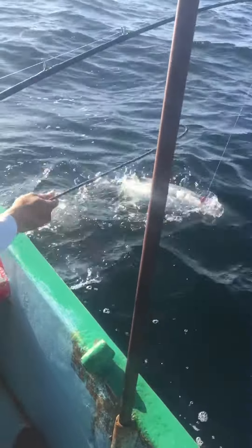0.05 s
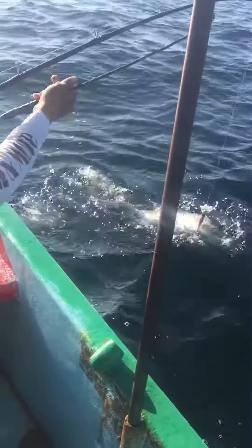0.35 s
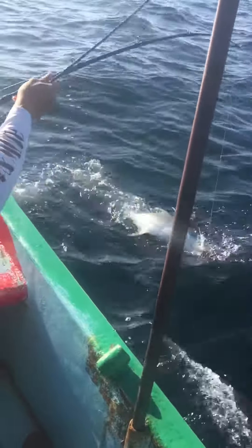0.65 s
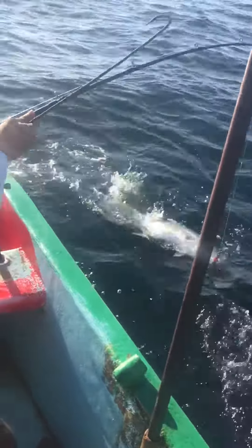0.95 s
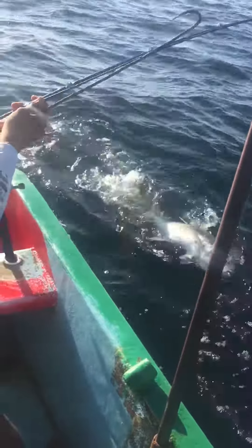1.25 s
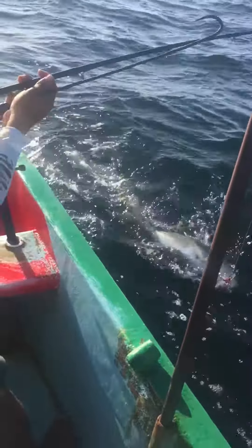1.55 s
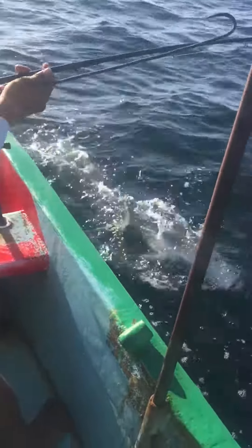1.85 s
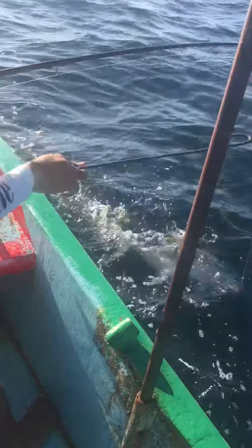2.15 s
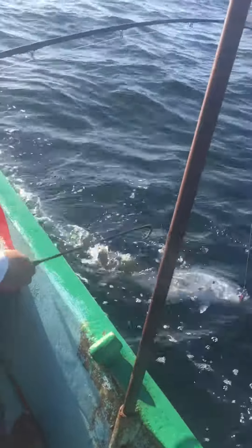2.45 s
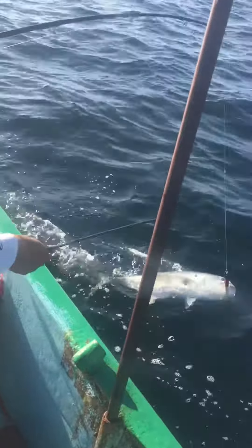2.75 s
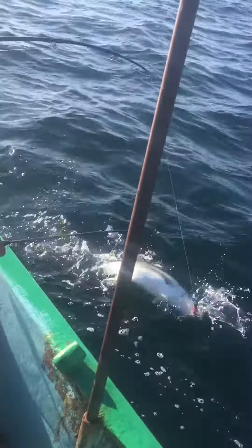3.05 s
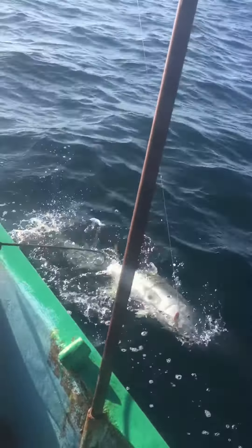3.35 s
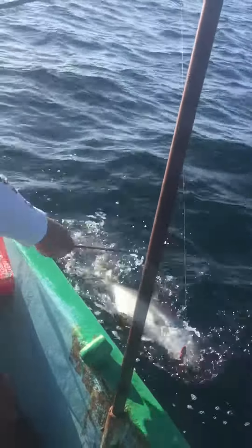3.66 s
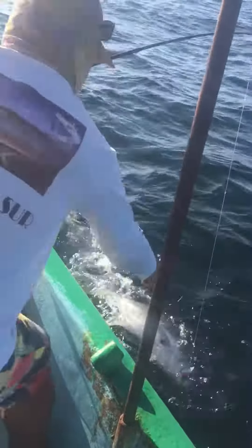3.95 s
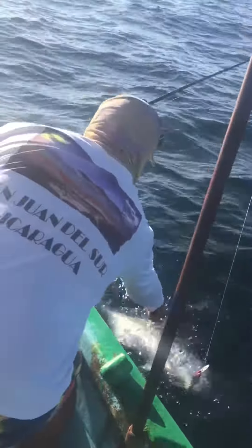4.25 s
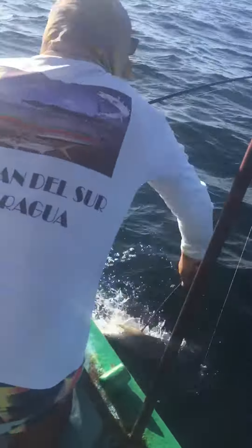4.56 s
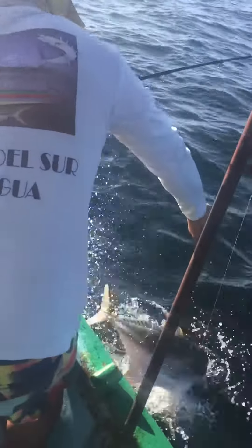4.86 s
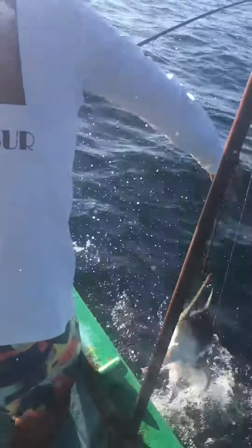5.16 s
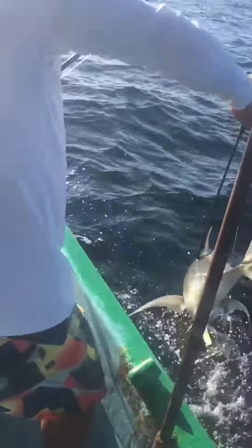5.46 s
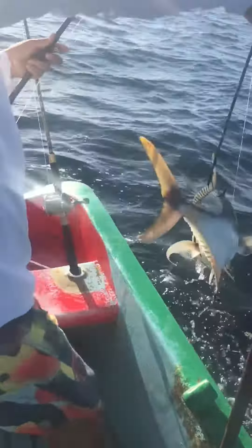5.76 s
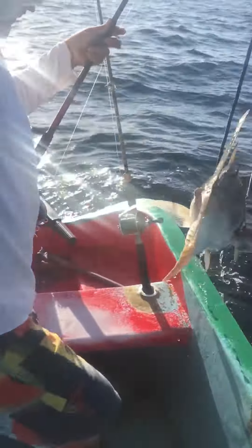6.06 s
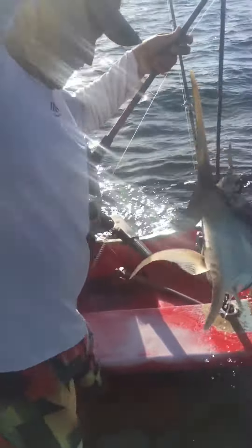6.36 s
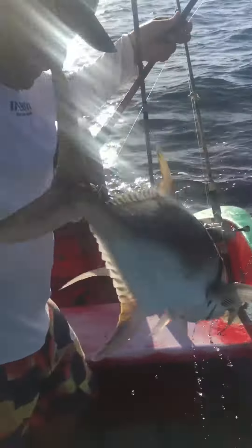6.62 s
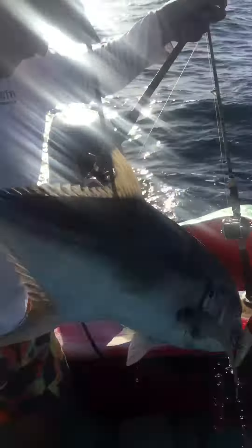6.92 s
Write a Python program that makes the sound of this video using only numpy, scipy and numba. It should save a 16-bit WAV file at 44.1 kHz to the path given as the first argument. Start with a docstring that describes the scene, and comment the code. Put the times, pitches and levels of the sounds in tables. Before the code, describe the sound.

From the start, a hooked fish thrashes at the surface close beside a small boat, in uneven bouts of bubbling, sharp tail slaps and pattering spray. Wind rumbles and buffets the microphone, gusting most from about 1 to 4 seconds, over a faint, steady wash of waves. Near 1 second a loud plop comes with a ringing knock on the hull. The splashing continues, with a burst of spray at about 3.3 seconds and a deep gulp at 3.6. A heavy hull knock lands around 4.3 seconds, followed by a lighter one. The biggest splashing runs from 4.5 to 5.2 seconds, ending with two softer knocks. The water then thins to drips and low gurgles. From about 6 seconds the fish bumps dully aboard several times while fishing tackle clicks and rattles, until the end near 7 seconds.

```python
"""A hooked fish thrashes at the surface beside a small open boat and is hauled aboard.
Its tail slaps up spray and traps air in the water. Each bubble rings like a tiny bell: big ones low,
small ones high. Heavy blows make the hull ring, and the fish bumps and the tackle clicks as it comes
over the side. Wind rumbles and buffets on the microphone, over a soft wash of waves."""
import sys
import numpy as np
from scipy import signal
from scipy.fft import rfft, irfft, next_fast_len
from scipy.io import wavfile
from scipy.ndimage import uniform_filter1d, map_coordinates
from numba import njit

SR = 44100
rng = np.random.default_rng(int(sys.argv[2]) if len(sys.argv) > 2 else 0)


def store_wav(level_fs):
    """Save 16-bit WAV to argv[1]."""
    pcm = np.round(np.clip(np.atleast_2d(level_fs), -1, 1) * 32767)
    wavfile.write(sys.argv[1], SR, pcm.T.astype(np.int16))


N = 308259
TIME = np.arange(N) / SR

# bouts of thrashing: (time [s], hold [s], bubbling [dB], spray [dB])
BOUTS = [(0, 0.011, -43.5, -51), (0.116, 0.1, -50.5, -61.5), (0.233, 0.42, -45.5, -55.5),
         (0.67, 0.46, -43, -52.5), (1.271, 0.2, -46, -51.5), (1.542, 0.24, -46.5, -58.5),
         (1.967, 0.11, -46.5, -59.5), (2.473, 0.12, -51, -52.5), (2.695, 0.4, -50, -63.5),
         (2.901, 0.13, -46.5, -48), (3.159, 0.099, -51, -48), (3.27, 0.11, -40, -48.5),
         (3.347, 0.02, -40, -35.5), (3.529, 0.33, -46, -51), (4.012, 0.029, -47.5, -64),
         (4.516, 0.088, -43, -47.5), (4.613, 0.56, -38, -41.5), (4.64, 0.024, -40.5, -42),
         (5.247, 0.38, -51.5, -53), (5.575, 0.06, -53.5, -50), (5.736, 0.16, -69, -53),
         (6.114, 0.066, -72, -64), (6.494, 0.34, -72, -62)]
# tail slaps and falling sheets of water: (time [s], body [dB], pitch [Hz], fizz [dB])
TAIL_SLAPS = [(0.432, -29.5, 1500, -63), (0.481, -33, 2190, -32), (0.692, -25.5, 2000, -39),
              (1.011, -27.5, 2580, -41), (1.263, -32.5, 1778, -46), (1.317, -29.5, 1870, -34.5),
              (1.657, -36, 2940, -61), (1.851, -37, 2860, -44), (2.146, -33, 2200, -41),
              (2.165, -24, 3130, -26.5), (2.492, -30.5, 2950, -72), (2.525, -30.5, 1970, -31.5),
              (2.589, -28, 1530, -48), (2.615, -29.5, 1430, -32), (2.936, -29.5, 1160, -70),
              (3.04, -36, 2020, -50), (3.115, -27.5, 2690, -40), (3.305, -22.5, 2680, -36),
              (3.664, -31, 1880, -59), (3.702, -31.5, 1240, -44), (3.82, -29, 1700, -28),
              (3.873, -35, 1700, -42), (4.11, -50, 1500, -38.5), (4.426, -30, 1430, -40),
              (4.53, -17.5, 2280, -40), (4.781, -26, 1510, -38), (4.866, -17.5, 1920, -38),
              (4.886, -22, 1710, -45), (5.057, -26, 2600, -35.5), (5.733, -38, 4200, -59),
              (5.785, -30.5, 3130, -55), (5.823, -25.5, 3600, -59)]
# air pockets and drips that ring: (time [s], level [dB], pitch [Hz])
AIR_POCKETS = [(0.01, -29, 1025), (.246, -27.5, 994), (0.941, -8.5, 775), (1.484, -32.5, 696),
               (1.828, -29, 2020), (1.931, -34, 2020), (2.163, -25, 710), (2.526, -31, 1930),
               (2.937, -22, 882), (3.043, -31.5, 840), (3.28, -29, 994), (3.808, -27, 1430),
               (3.872, -32.5, 866), (4.187, -39, 1880), (4.538, -31, 815), (4.788, -21, 1114),
               (4.866, -15.5, 1095), (5.08, -27.5, 726), (5.952, -45.5, 2020), (6.154, -38.5, 2110),
               (6.295, -41, 1120)]
# air holes closing or opening: (time [s], level [dB], first pitch [Hz], last pitch [Hz], length [s])
CAVITIES = [(0.445, -31, 585, 1240, 0.023), (0.552, -37, 1930, 2640, 0.022),
            (0.561, -34.5, 1234, 630, 0.025), (1.132, -37, 892, 1330, 0.036),
            (1.803, -43, 1000, 1460, .025), (1.938, -43.5, 1560, 1100, 0.039),
            (6.155, -42.5, 736, 1010, 0.019)]
# water gulping under the fish and against the boat, and at the end the fish sliding across the deck: (time [s],
# level [dB], pitch [Hz], fade time [s])
HOLLOWS = [(.268, -33.5, 417, 0.2), (.742, -23.5, 282, 0.15), (1.0, -13, 500, 0.055),
           (3.108, -34.5, 446, 0.12), (3.576, -6.5, 485, 0.02), (3.598, -27.5, 430, 0.1),
           (3.706, -30.5, 483, 0.32), (4.075, -33, 497, 0.12), (5.46, -40, 550, 0.31),
           (5.61, -49.5, 730, 0.77), (5.822, -35.5, 330, 0.3), (5.9, -47.5, 617, 0.21),
           (6.2, -52.5, 940, 0.53), (6.93, -43, 503, 0.49)]
# single drops landing close by: (time [s], tick [dB], bubble [dB], bubble pitch [Hz])
NEAR_DROPS = [(.013, -39, -44, 8300), (.281, -40, -36, 5640), (0.853, -42, -41, 3600),
              (.902, -26, -41, 6920), (1.442, -48, -34, 8550), (1.676, -30, -32.5, 3040),
              (1.829, -39, -36, 2940), (2.037, -36, -40, 6350), (2.585, -31.5, -29, 8250),
              (2.83, -38, -56, 7060), (3.228, -50, -33.5, 5400), (3.608, -31, -39, 4500),
              (3.636, -33, -30.5, 8200), (4.07, -49, -41, 4100), (4.108, -36, -40.5, 3240),
              (4.204, -42, -42, 6300), (5.485, -51, -36, 3780), (5.856, -42, -39, 11800),
              (5.946, -38.5, -41.5, 3620)]
# blows on the hull: (time [s], thud [dB], push time [s], ring [dB], crack [dB], top of the crack [Hz],
# centre of the ring [Hz], place along the hull [m])
HULL_BLOWS = [(.968, -20.5, 0.015, -17, -23.5, 3970, 540, .784),
              (4.274, -12, 0.009, -12.5, -19, 12100, 530, 2.678),
              (4.403, -23.5, 0.01, -21, -30.5, 7100, 403, 0.29),
              (5.203, -25, 0.011, -24, -28, 3000, 438, 0.333),
              (5.36, -30, 0.0083, -21, -32.5, 1790, 480, 2.9)]
# the tones of the hull's panels: (pitch [Hz], level [dB], fade time [s])
HULL_TONES = [(257, 3.5, 0.21), (312.8, 9, 0.19), (363, -8, 0.32), (467.2, 0, 0.28), (528, -6.5, 0.33),
              (590, -26, 0.099), (668.4, 1.5, 0.15), (790, -7, 0.072), (853, -6, 0.25), (916, 1, 0.12),
              (1031, 2.5, 0.13), (1130, 4, 0.18), (1230, -4, 0.11), (1480, -21, 0.23), (1754, -4, 0.15)]
# dull bumps as the fish is swung in: (time [s], level [dB], first pitch [Hz], fade time [s])
FISH_BUMPS = [(5.901, -31, 200, .09), (6.096, -25, 153, 0.14), (6.519, -16, 199, 0.093),
              (6.557, -25.5, 180, 0.061), (6.671, -27, 398, 0.085), (6.678, -20.5, 168, 0.07),
              (6.685, -38, 640, .025), (6.784, -25.5, 227, 0.033), (6.883, -20.5, 190, .07)]
# rod, hook and tackle clicking: (time [s], tick [dB], ring [dB], ring pitch [Hz])
TACKLE_CLICKS = [(6.393, -41, -37.5, 4700), (6.45, -42, -53, 6650), (6.495, -44, -49, 8500),
                 (6.513, -42, -52, 9500), (6.53, -40, -45, 8500), (6.543, -31, -43, 7450),
                 (6.561, -33, -40, 8300), (6.596, -44, -39.5, 3670), (6.653, -21, -37, 6800),
                 (6.721, -28.5, -30, 3080), (6.733, -50, -32.5, 1240), (6.741, -55, -38, 1070),
                 (6.786, -34, -38, 7100), (6.879, -31, -39.5, 7250), (6.98, -29, -48, 5730)]
# the wind's slow rise and fall: (time [s], level [dB])
WIND_LEVELS = [(0, -34), (.4, -36.5), (.77, -34.5), (.92, -41), (1.17, -31.5), (1.62, -35), (1.85, -31),
               (2.3, -31), (2.62, -34), (2.93, -28.5), (3.07, -41), (3.28, -32.5), (3.68, -36),
               (3.85, -31.5), (4.03, -38.5), (4.25, -39), (4.52, -34.5), (4.95, -36.5), (5.12, -36),
               (5.26, -39.5), (5.45, -32), (5.74, -41.5), (6.1, -49), (6.22, -46.5), (6.7, -39),
               (6.99, -37.5)]
# sheltered by the angler, the wind turns deeper: (time [s], bass gain [dB], deep rumble gain [dB])
WIND_SHELTER = [(0, 1, -17), (4, -4, -46), (5.2, 3.5, -28), (6.2, 6, 4), (6.6, -12, -1.5), (7, -9, -5.5)]
# strong swirls of air hitting the microphone: (time [s], level [dB], pitch [Hz])
STRONG_EDDIES = [(0.236, -20, 168), (1.25, -14.5, 192), (1.444, -12, 187), (1.804, -16.5, 161),
                 (1.846, -17, 161), (2.019, -14.5, 200), (2.061, -12.5, 266), (2.121, -13.5, 212),
                 (2.755, -15, 176), (2.958, -16.5, 194), (3.193, -15, 179), (3.419, -11, 234),
                 (3.584, -8.5, 328), (3.591, -9.5, 96), (3.824, -11.5, 197)]
# tone colours, or how strong each sound is from low to high: (frequency [Hz], level [dB])
WATER_SPECTRUM = [(250, 19), (500, -1), (700, 3.5), (1120, 0.5), (1320, -1.5), (1650, -2), (2300, -7),
                  (3200, -7), (5000, -15.5), (8500, -18.5), (10300, -23), (12000, -22), (16000, -27.5)]
DROP_SPECTRUM = [(1000, -23), (3000, 4), (6000, 11), (9000, 7.5), (10300, -1), (12000, 8), (15000, 5)]
THUD_SPECTRUM = [(30, -47), (60, -11), (170, 1.5), (320, -22), (480, 0.5), (680, -2), (950, -21.5),
                 (1200, -1.5), (1550, -32), (2500, -18), (5000, -32), (16000, -45)]
CRACK_SPECTRUM = [(300, 3.5), (1100, 13), (3500, -4), (4600, -9.5), (6500, -7), (10000, -13), (16000, -9)]
WIND_SPECTRUM = [(20, -19), (32, -36), (48, -4), (70, 2), (130, 2.5), (190, -2), (290, -7.5), (370, -14.5),
                 (470, -29), (700, -70), (2000, -90)]
SEA_SPECTRUM = [(60, -38), (300, 8.5), (900, -1), (2000, -10.5), (4000, -11.5), (5500, -18), (9000, -16.5),
                (10300, -26), (12000, -18.5), (16000, -25)]

TOP_HZ = 15700  # the treble ends here


def thrashing(column, fall_db_per_s, idle_db):
    """Level of the churned water in dB: each bout rises, holds while the fish beats, then settles."""
    t, rise_s = TIME[::40], 0.022
    power = undb(2 * idle_db)  # water running off between bouts
    for bout in BOUTS:
        age, hold_s = t - bout[0], bout[1]
        rise = np.clip(age / rise_s, 0, 1)
        db = bout[column] - fall_db_per_s * np.maximum(age - hold_s, 0)
        power = power + (rise * undb(db)) ** 2
    return np.interp(TIME, t, 10 * np.log10(power))


def churn(bubbling_db, spray_db):
    """The fish stirs up bubbles, crackling drops and froth: big ones burble, small ones hiss as spray."""
    bubbles = cloud(count=2200, size=3, low_hz=400, high_hz=14000, cycles=64, scatter_db=4.6, glide=.06)
    drops = cloud(count=3600, size=5, low_hz=400, high_hz=17000, cycles=14, scatter_db=4.2, glide=0.)
    froth = cloud(count=12000, size=6, low_hz=400, high_hz=17000, cycles=45, scatter_db=1, glide=.05)
    rush = unit(band(rng.standard_normal(N), 400, "high"))
    # harder thrashing merges the drops into froth, then into a smooth rush
    drops_db = -2.5
    froth_db = np.clip((bubbling_db + 47.5) * 1.3, -3, 6)
    rush_db = np.minimum(2 * (bubbling_db + 43), 4)
    water = bubbles + undb(drops_db) * drops + undb(froth_db) * froth + undb(rush_db) * rush
    water /= np.sqrt(1 + undb(2 * drops_db) + undb(2 * froth_db) + undb(2 * rush_db))
    water = colour(water, WATER_SPECTRUM) * undb(1.4 * wander(35))  # it lands in clumps
    bubbling = unit(band(water, 2320, "low", order=3)) * undb(bubbling_db)
    spray = unit(band(water, 2720, "high", order=3)) * undb(spray_db)
    return bubbling + spray


def slaps():
    """Each slap is a sudden burst of bubbles around one size, with a fizz of fine drops on top."""
    out = np.zeros(N)
    spatter = cloud(count=14000, size=4, low_hz=400, high_hz=17000, cycles=40, scatter_db=2, glide=.1)
    for start, db, hz, fizz_db in TAIL_SLAPS:
        drops = spatter[int(start * SR):][:SR // 5]
        t60 = 0.049 * (1500 / hz) ** 0.5  # bigger bubbles last longer
        spectrum = [(hz / 5, -16), (hz / 2, -5), (hz, 0), (hz * 1.6, -6), (hz * 3, -23), (hz * 9, -44)]
        body = colour(drops, spectrum)
        fizz = colour(drops, [(2500, -22), (5200, 0), (9000, -1), (11000, -7), (15000, -13)])
        add(out, start, undb(db) * burst(body, t60, rise_s=0.003))
        add(out, start, undb(fizz_db) * burst(fizz, t60=0.02, rise_s=0.0011))
    return out


def plops():
    """Big air pockets dragged under by the tail break up fast; small drips ring longer. Both chirp up."""
    start, db, hz = (np.array(column, float) for column in zip(*AIR_POCKETS))
    cycles = np.clip(-1.8 * db, 20, 70)
    return ring_bubbles(start, hz, cycles, undb(db), glide=.45)


def gurgles():
    """The air in a hole sings a short note that rises as the hole closes or falls as it opens."""
    out = np.zeros(N)
    for start, db, from_hz, to_hz, length_s in CAVITIES:
        progress = np.linspace(0, 1, int(length_s * SR))
        hz = from_hz * (to_hz / from_hz) ** progress
        add(out, start, undb(db) * np.sin(np.pi * progress) * np.sin(2 * np.pi * np.cumsum(hz) / SR))
    return out


def stray_bubbles(bubbling_db, count=190, size=3):
    """Air pockets split into a few unlike bubbles, louder in busy water until the froth swallows them."""
    spread_s, spread_octaves = 0.035, 0.62
    when, radius, force = rng.random((3, count, 1))
    lag, detune, share = rng.random((3, count, size))
    start = when * N / SR + spread_s * lag
    hz = (560 * 5 ** radius * 2 ** (spread_octaves * (detune - .5))).ravel()
    water_db = np.minimum(bubbling_db[(when * N).astype(int)], -43.5)
    peak = undb(water_db + 9 + 7.5 * (2 * force - 1) - 5 * radius) * share
    cycles = 49 * np.sqrt(hz / 1500)
    return ring_bubbles(start.ravel(), hz, cycles, peak.ravel(), glide=0.23)


def gulps():
    """A hollow in the water caves in and makes a dull cluster of very big bubbles; the same dull burst also
    gives the fish scraping across the deck."""
    out = np.zeros(N)
    pockets = cloud(count=4000, size=3, low_hz=200, high_hz=2000, cycles=12, scatter_db=1, glide=.15)
    for k, (start, db, hz, t60) in enumerate(HOLLOWS):
        bubbles = pockets[k * SR // 3:][:SR // 3]
        hollow = colour(bubbles, [(hz / 2.5, -12), (hz, 0), (hz * 1.7, -14), (hz * 4, -40)])
        add(out, start, undb(db) * burst(hollow, t60, rise_s=0.0023))
    return out


def droplets(spray_db, count=130):
    """Each drop ticks as it lands and traps a tiny ringing bubble."""
    ticks, t = np.zeros(N), TIME[:SR // 20]
    when, force, pitch = rng.random((count, 3)).T
    # flung drops stand out of the spray until it becomes a sheet
    db = np.minimum(spray_db[(when * N).astype(int)], -54) + 15 - 2 * force ** 2
    flung = np.column_stack([when * N / SR, db, db - 11, 2300 * 4 ** pitch])  # laid out like NEAR_DROPS
    starts, tick_db, ring_db, hz = np.vstack([flung, NEAR_DROPS]).T.copy()
    for start, level_db in zip(starts, tick_db):
        add(ticks, start, undb(level_db) * fade(t, t60=0.0088) * (1 - np.exp(-t / 0.0003)))
    cycles = 77 * np.sqrt(hz / 5000)
    rings = ring_bubbles(starts + .001, hz, cycles, undb(ring_db), glide=0.12)
    return ticks * noise(N, DROP_SPECTRUM) + rings


def cloud(count, size, low_hz, high_hz, cycles, scatter_db, glide):
    """Each of `count` falling blobs of water makes `size` similar bubbles, some far louder than others."""
    when, pitch, force = rng.random((3, count, 1))
    lag, detune, life, share = rng.random((4, count, size))
    blob_hz = (np.sqrt(low_hz) + pitch * (np.sqrt(high_hz) - np.sqrt(low_hz))) ** 2
    hz = blob_hz * 2 ** ((detune - .5) / 2)
    strength = -np.log(force + np.exp(-4)) * (hz / 4000) ** .25  # fine drops vary most in force
    peak = undb(scatter_db * strength) * hz ** (3 / 5) * share ** 2
    start = when * N / SR + .012 * lag ** 2
    ring_cycles = cycles * (.5 + life) * (hz / 3000) ** .4  # big bubbles break up after fewer cycles
    return unit(ring_bubbles(start.ravel(), hz.ravel(), ring_cycles.ravel(), peak.ravel(), glide))


@njit
def ring_bubbles(start, hz, cycles, peak, glide):
    """Each bubble is a pure tone that fades by 60 dB and glides up in pitch as it nears the surface."""
    out = np.zeros(N)
    for k in range(len(start)):
        first, length = int(start[k] * SR), int(cycles[k] * SR / hz[k]) + 2
        step, loss = 2 * np.pi * hz[k] / SR, np.exp(-6.9 / length)
        phase, size = 0., peak[k]
        for i in range(min(length, N - first)):
            phase += step * (1 + glide * i / length)
            size *= loss
            out[first + i] += size * np.sin(phase) * min(phase / 11, 1.)
    return out


def water_echoes(x, bounce_gain=.4, scatter_db=-9):
    """The side of the boat throws back one close echo, and the facing waves a short scatter of them."""
    t = TIME[:SR // 10]
    echoes = rng.standard_normal(len(t)) * fade(t, t60=0.11) * (t > .002)
    scatter = signal.fftconvolve(x, echoes / np.sqrt(np.sum(echoes ** 2)))[:N]
    delay_s = .0011 * np.exp(.25 * wander(2))  # sways as fish and boat move
    bounce = map_coordinates(x, [(TIME - delay_s) * SR])
    return (x + bounce_gain * bounce) / np.hypot(1, bounce_gain) + undb(scatter_db) * scatter


def hull_blows():
    """A blow cracks on contact, swells to a thud as the weight follows, and leaves the panels ringing."""
    out, t = np.zeros(N), TIME[:SR // 2]
    hz, db, t60 = np.transpose(HULL_TONES)[:, :, None]
    wavelength_m = .3 / np.sqrt(hz / 1000)  # of the waves that bend the hull
    for start, thud_db, push_s, ring_db, crack_db, top_hz, centre_hz, place_m in HULL_BLOWS:
        # a tone stays weak when the blow lands where that tone hardly moves the hull
        reach = .2 + np.abs(np.sin(2 * np.pi * place_m / wavelength_m))
        weight = reach * undb(db - 4 * np.log2(hz / centre_hz) ** 2)
        weight /= np.sqrt(np.sum(weight ** 2) / 2)
        detune, phase = rng.uniform(-1.05, 1, (2, len(HULL_TONES), 1))
        tones = weight * np.sin(2 * np.pi * (hz * (1 + 0.0045 * detune) * t + phase))
        shudder = noise(len(t), THUD_SPECTRUM)  # the rest of the boat
        swell = (t / push_s * np.exp(1 - t / push_s)) ** 3
        thud = unit((tones.sum(axis=0) + shudder / 2) * swell) * np.sqrt(np.mean(swell ** 2))
        boom = undb(-1.5) * band(shudder, 940, "low") * fade(t, 0.26)
        ring = ((tones * fade(t, t60)).sum(axis=0) + boom) * (1 - np.exp(-t / push_s))
        crack = band(noise(len(t), CRACK_SPECTRUM) * fade(t, 0.13), top_hz, "low", order=4)
        add(out, start, undb(thud_db) * thud + undb(ring_db) * ring + undb(crack_db) * crack)
    return out


def fish_bumps(rise_s=0.0024, sag_s=0.012, end_share=0.366):
    """The soft, heavy fish bumps aboard: a short low tone that sinks in pitch as it dies."""
    out, t = np.zeros(N), TIME[:SR // 5]
    sag = end_share + (1 - end_share) * np.exp(-t / sag_s)
    for start, db, hz, t60 in FISH_BUMPS:
        shape = (1 - np.exp(-t / rise_s)) ** 2 * fade(t, t60)
        add(out, start, undb(db) * shape / shape.max() * np.sin(2 * np.pi * np.cumsum(hz * sag) / SR))
    return out


def tackle():
    """Hard fishing gear strikes with a bright tick, then a short rattling ring."""
    out, t = np.zeros(N), TIME[:SR // 5]
    snap = fade(t, t60=.006)
    rattle = undb(-14) * snap + fade(t, 0.057) + undb(-13) * fade(t, 0.23)  # hit, ring, echo in the boat
    for start, tick_db, ring_db, hz in TACKLE_CLICKS:
        tick = noise(len(t), [(1200, -32), (3500, -10), (7000, -1), (11000, 11.5), (15000, 9.5)])
        ring = noise(len(t), [(hz / 3, -36), (hz / 1.4, -5), (hz, 0), (hz * 1.8, -11), (hz * 3.5, -23)])
        add(out, start, undb(tick_db) * tick * snap + undb(ring_db) * ring * rattle)
    return out


def wind(gust_db=2.14, buffet_at_s=3.61, buffet_half_s=0.016):
    """Air tumbles over the microphone; stronger wind makes smaller, faster swirls that sound higher."""
    db = curve(WIND_LEVELS, column=1) + gust_db * wander(14)
    rumble = noise(N, WIND_SPECTRUM)
    rumble /= np.sqrt(uniform_filter1d(rumble ** 2, size=3000))  # even it out before the gusts shape it
    bass = band(band(rumble, 124, "low")[::-1], 150, "low")[::-1]
    flutter = rumble - bass
    bass_gain = undb(curve(WIND_SHELTER, column=1))
    flutter_gain = undb(1.37 * np.minimum(db + 33, 3))
    deep = undb(curve(WIND_SHELTER, column=2)) * noise(N, [(20, -33), (45, 1), (70, 2), (300, -88)])
    buffet = undb(-10) * np.exp(-((TIME - buffet_at_s) / buffet_half_s) ** 4) * flutter  # one heavy gust
    return undb(db) * (deep + bass_gain * bass + flutter_gain * flutter) + buffet


def eddies(count=45):
    """Each swirl of air pushes and pulls once; small ones come at random and grow with the wind."""
    out, t = np.zeros(N), TIME[:SR // 10] - 1 / 20
    when, weakness, pitch = rng.random((count, 3)).T
    wind_db = curve(WIND_LEVELS, column=1)[(when * N).astype(int)]
    lull_db = np.minimum(wind_db + 35, 0)  # weaker still in a lull
    small_db = wind_db + lull_db + 14.5 - 3 * weakness
    small_eddies = zip(when * N / SR, small_db, 174 * 2 ** (pitch - .5))
    for start, db, hz in [*small_eddies, *STRONG_EDDIES]:
        shape = np.exp(-(t * hz / 0.47) ** 2)
        add(out, start + t[0], undb(db) * shape * np.cos(2 * np.pi * (hz * t + rng.random())))
    return out


def sea():
    """Waves all around make a soft wash that slowly swells and sinks."""
    return noise(N, SEA_SPECTRUM) * undb(-59 + 1.5 * wander(3))


def undb(db):
    """Turn decibels into a gain to multiply by."""
    return 10 ** (np.asarray(db) / 20)


def unit(x):
    """Scale a sound to an average strength (rms) of 1."""
    return x / np.sqrt(np.mean(x ** 2))


def curve(table, column):
    """One column of a table, joined by straight lines in time."""
    rows = np.array(table)
    return np.interp(TIME, rows[:, 0], rows[:, column])


def colour(x, points):
    """Shape a sound's tone with (frequency [Hz], level [dB]) points, at strength 1."""
    hz, db = np.transpose(points)
    size = next_fast_len(len(x))
    freqs = np.maximum(np.fft.rfftfreq(size, 1 / SR), 1)
    gain = undb(np.interp(np.log(freqs), np.log(hz), db))
    return unit(irfft(rfft(x, size) * gain, size)[:len(x)])


def noise(length, points):
    """Random noise with the given tone colour."""
    return colour(rng.standard_normal(length), points)


def band(x, hz, kind, order=2):
    """Keep what is below ("low") or above ("high") a frequency."""
    return signal.sosfilt(signal.butter(order, np.minimum(hz, TOP_HZ), kind, fs=SR, output="sos"), x)


def fade(t, t60):
    """Die away by 60 dB in t60 seconds, the fade time."""
    return np.exp(-np.log(1000) * t / t60)


def burst(grains, t60, rise_s):
    """Make a steady sound start suddenly and die away."""
    t = TIME[:len(grains)]
    shape = fade(t, t60) * (1 - np.exp(-t / rise_s))
    return unit(grains * shape) * np.sqrt(np.mean(shape ** 2))


def wander(rate_hz):
    """A smooth random drift of strength 1."""
    steps = rng.standard_normal(4096)
    return unit(np.interp(TIME * rate_hz, np.arange(len(steps)), steps))


def add(track, start, sound):
    """Mix a sound into a track at a start time in seconds."""
    i = max(int(start * SR), 0)
    track[i:i + len(sound)] += sound[:max(N - i, 0)]


def scene():
    """Fish, boat, wind and sea at one microphone."""
    bubbling_db = thrashing(column=2, fall_db_per_s=61.5, idle_db=-64)
    spray_db = thrashing(column=3, fall_db_per_s=144, idle_db=-76)
    splashes = churn(bubbling_db, spray_db) + slaps() + plops() + gurgles()
    water = water_echoes(splashes + stray_bubbles(bubbling_db) + gulps() + droplets(spray_db))
    return (water + hull_blows() + fish_bumps() + tackle() + wind() + eddies() + sea())[None]


def record(dry):
    """The phone cuts the deepest bass and the top of the treble."""
    thin = band(dry, 35.5, "high", order=3)
    return signal.sosfilt(signal.ellip(10, .2, 80, TOP_HZ, fs=SR, output="sos"), thin)


dry = scene()
out = record(dry)
store_wav(out)
```